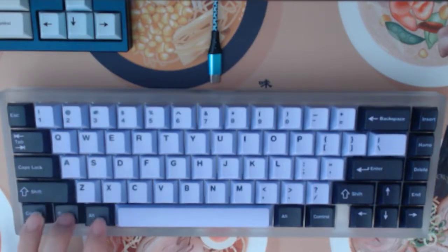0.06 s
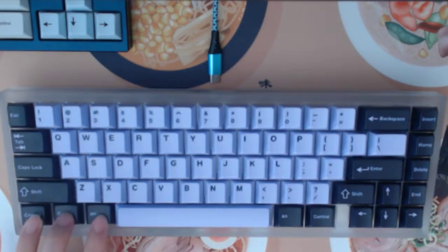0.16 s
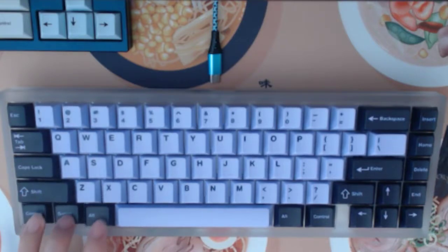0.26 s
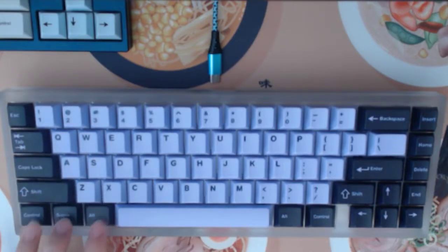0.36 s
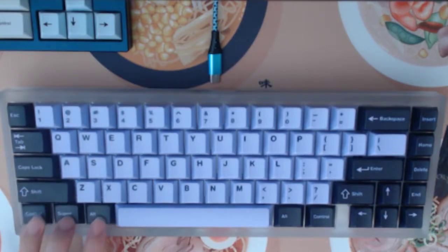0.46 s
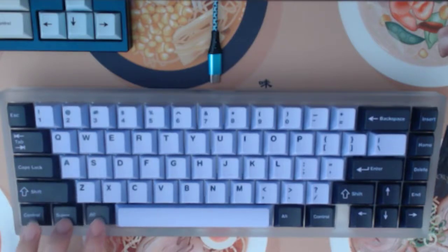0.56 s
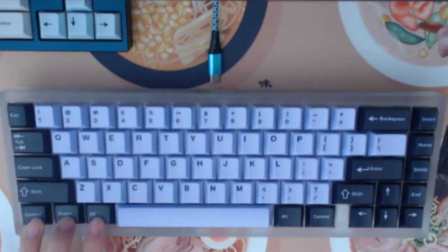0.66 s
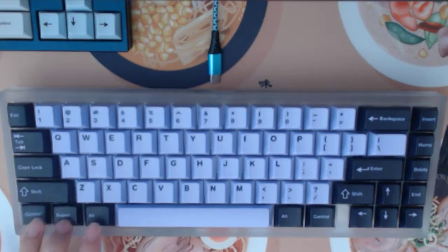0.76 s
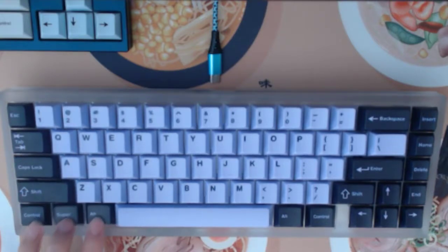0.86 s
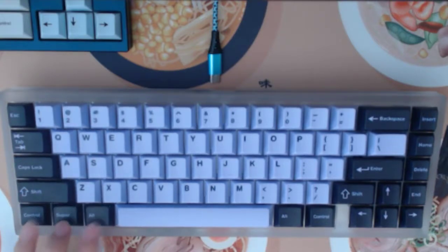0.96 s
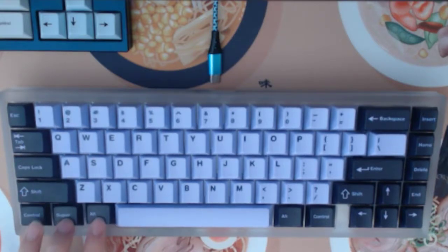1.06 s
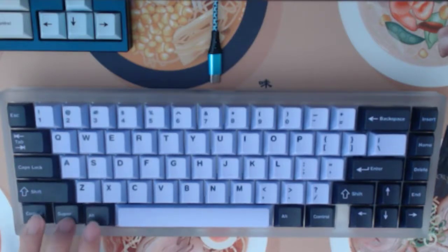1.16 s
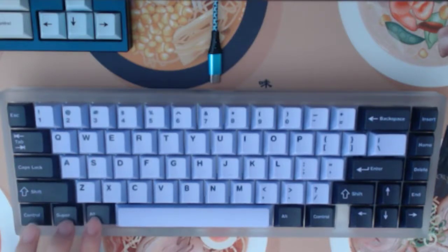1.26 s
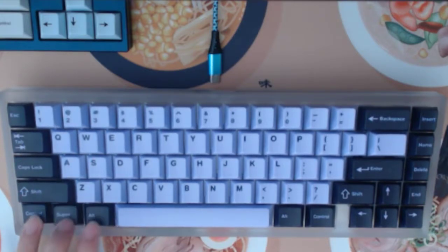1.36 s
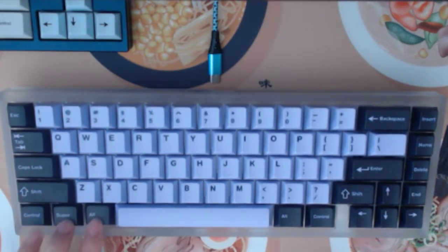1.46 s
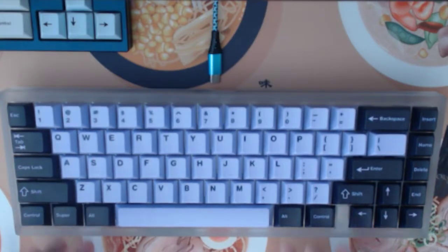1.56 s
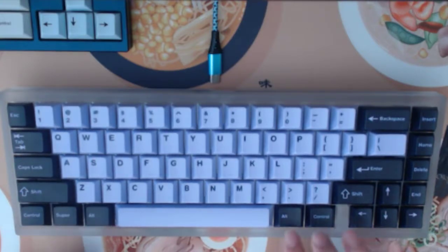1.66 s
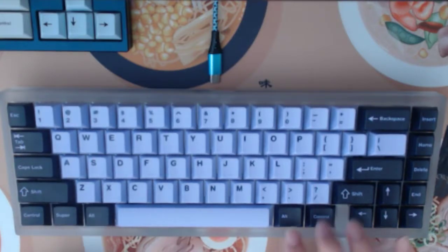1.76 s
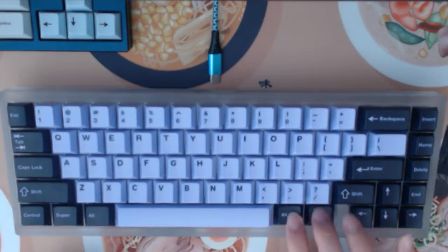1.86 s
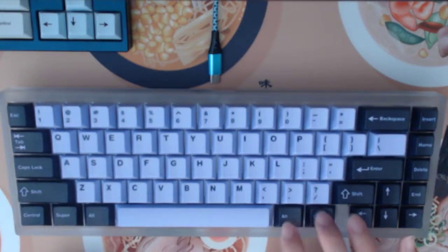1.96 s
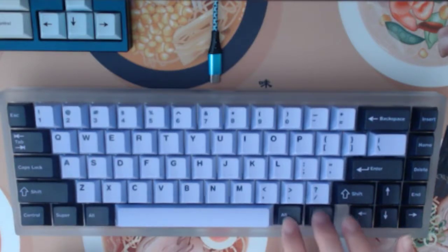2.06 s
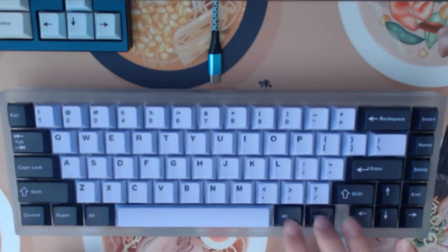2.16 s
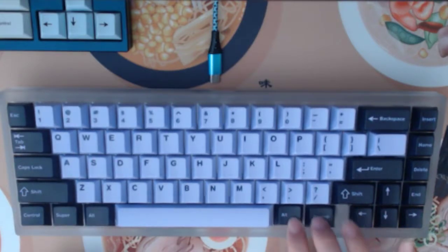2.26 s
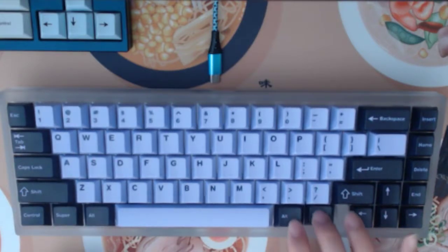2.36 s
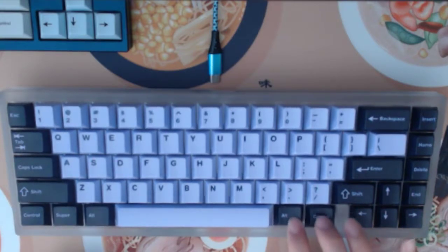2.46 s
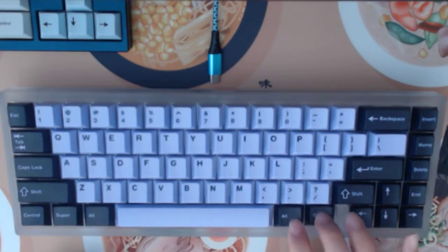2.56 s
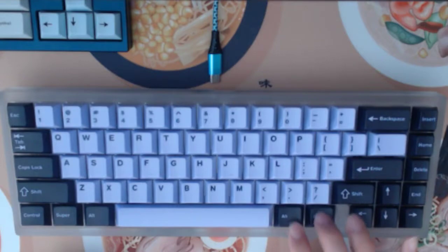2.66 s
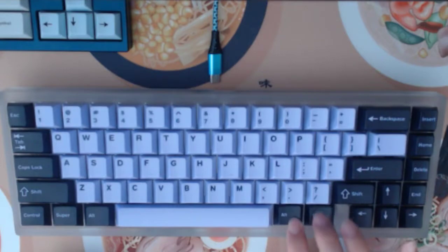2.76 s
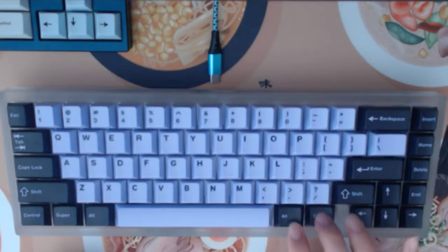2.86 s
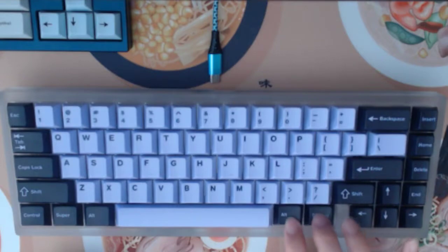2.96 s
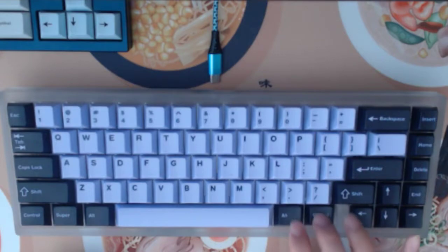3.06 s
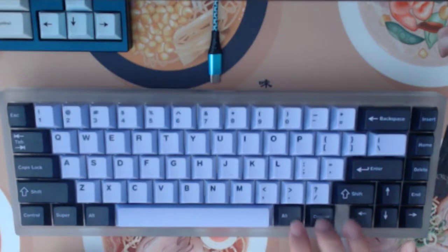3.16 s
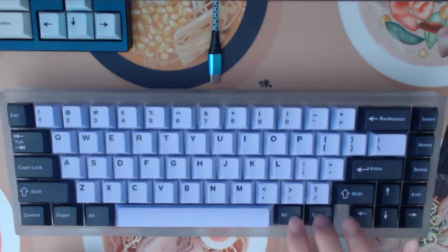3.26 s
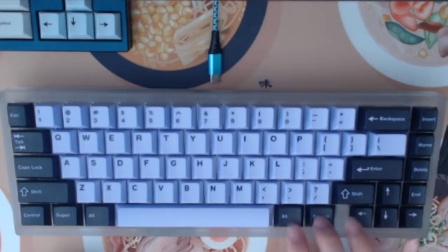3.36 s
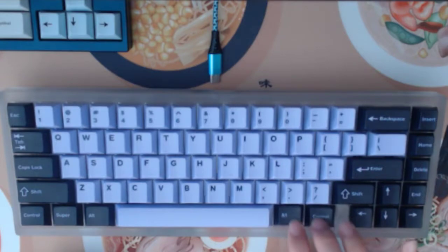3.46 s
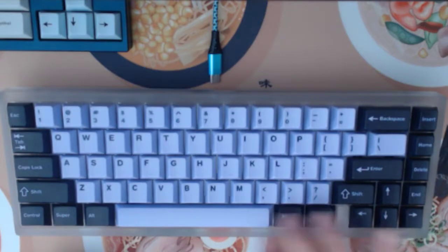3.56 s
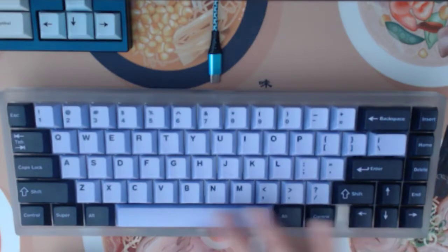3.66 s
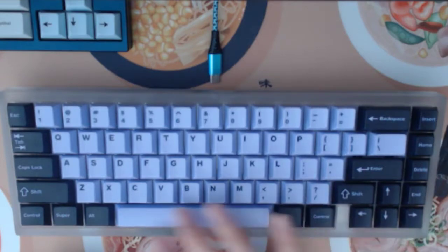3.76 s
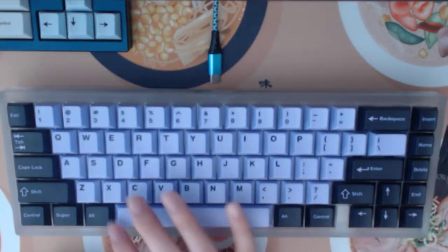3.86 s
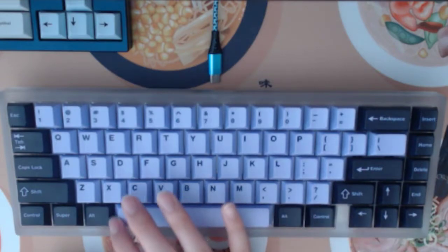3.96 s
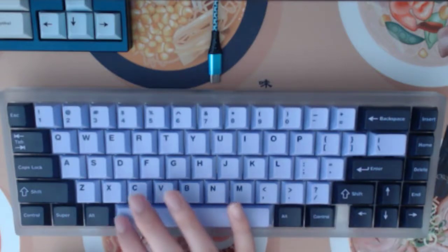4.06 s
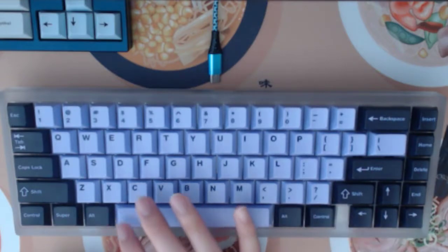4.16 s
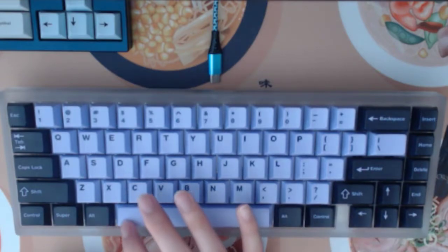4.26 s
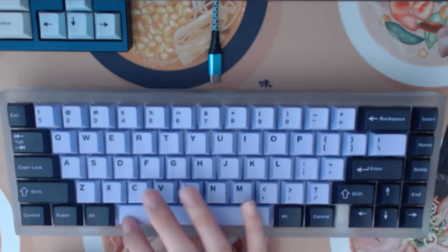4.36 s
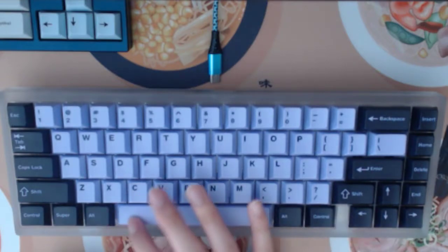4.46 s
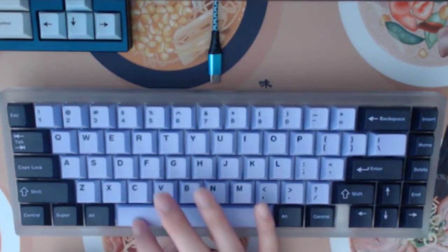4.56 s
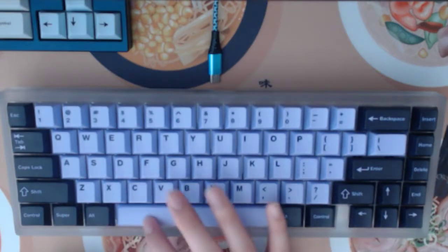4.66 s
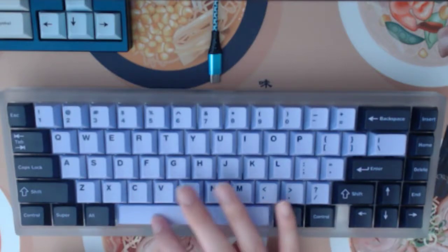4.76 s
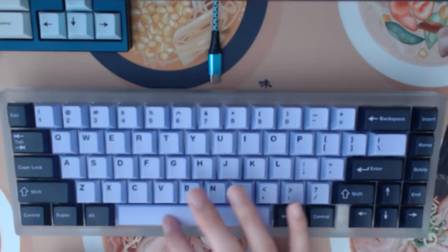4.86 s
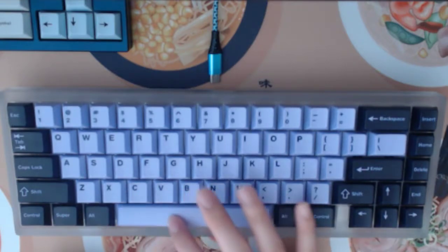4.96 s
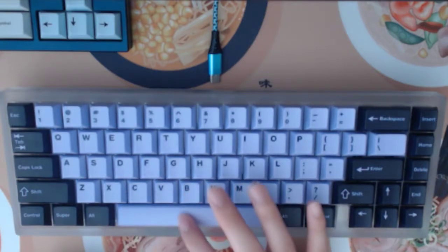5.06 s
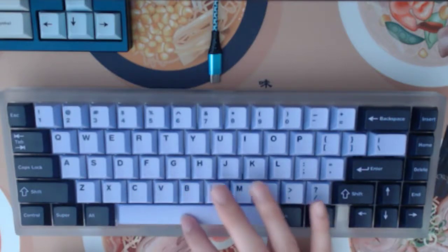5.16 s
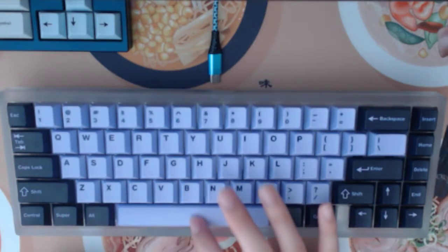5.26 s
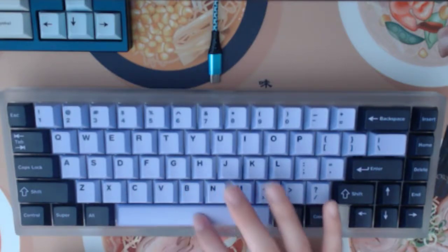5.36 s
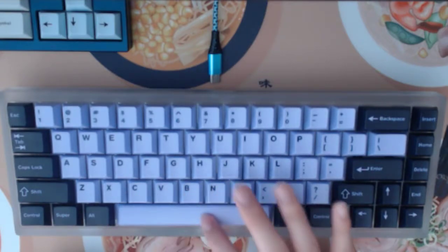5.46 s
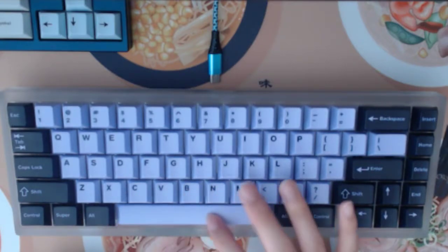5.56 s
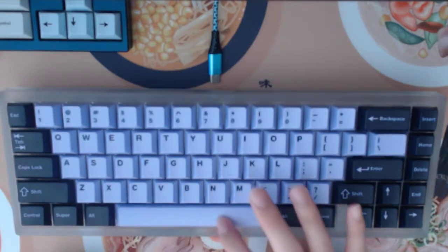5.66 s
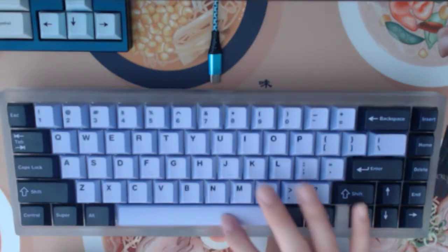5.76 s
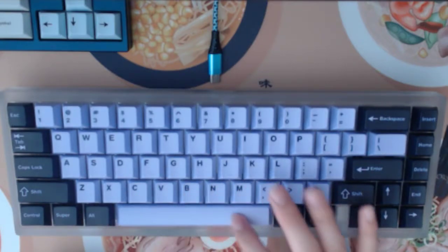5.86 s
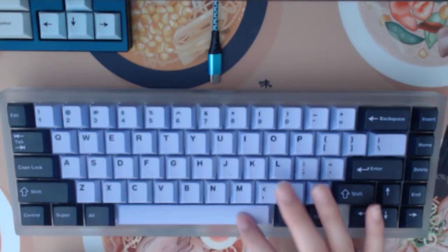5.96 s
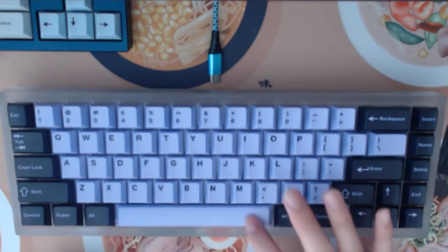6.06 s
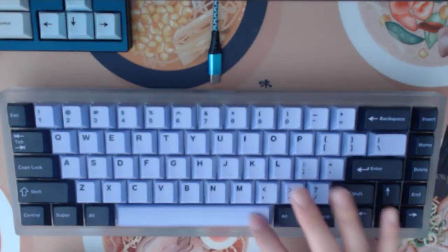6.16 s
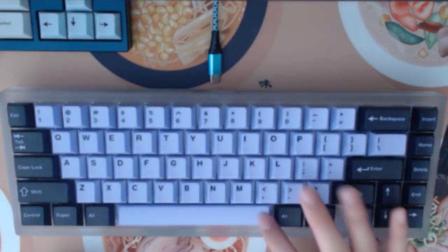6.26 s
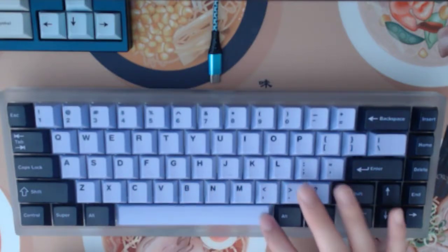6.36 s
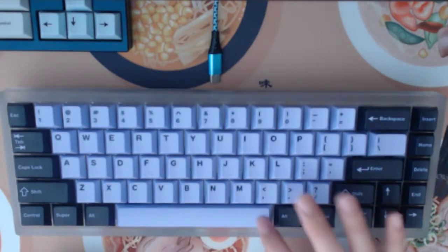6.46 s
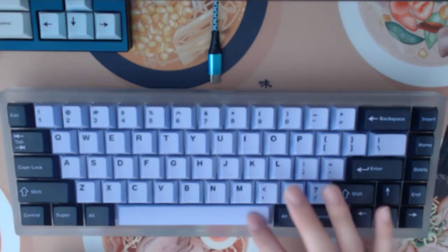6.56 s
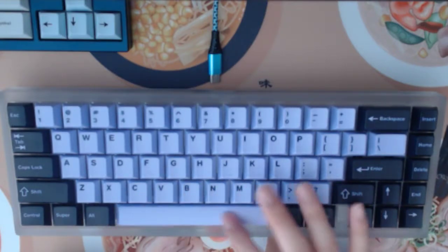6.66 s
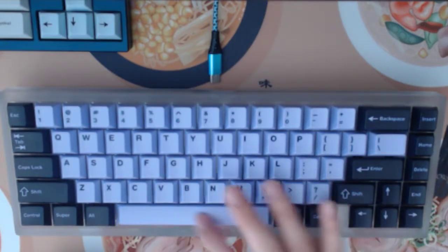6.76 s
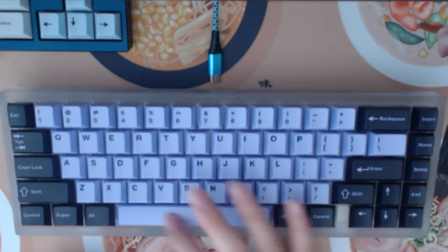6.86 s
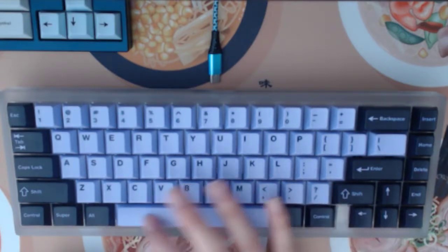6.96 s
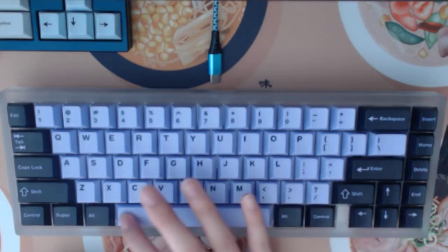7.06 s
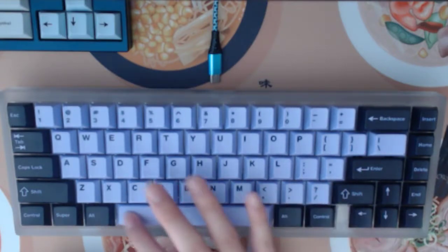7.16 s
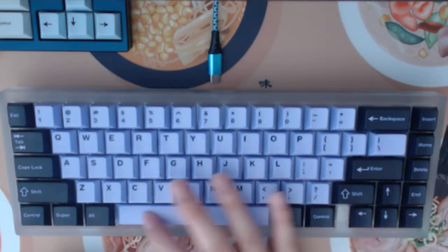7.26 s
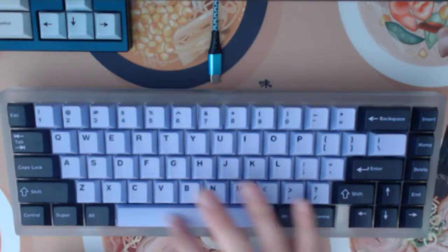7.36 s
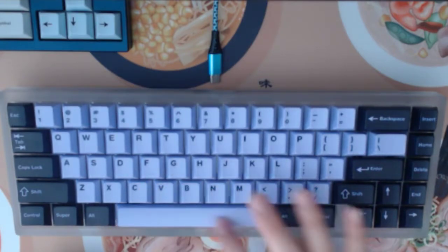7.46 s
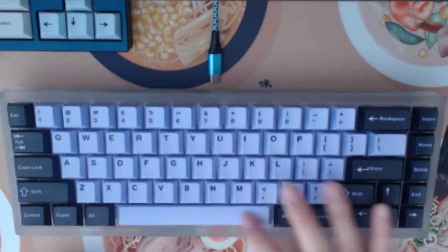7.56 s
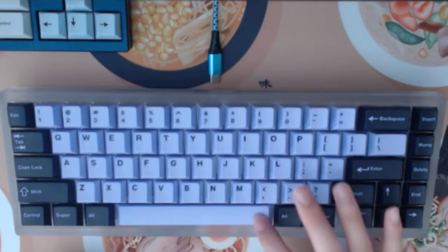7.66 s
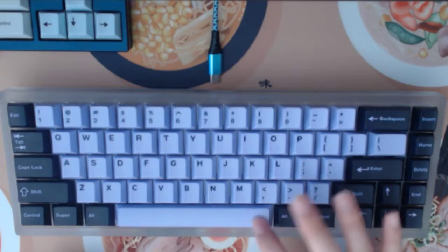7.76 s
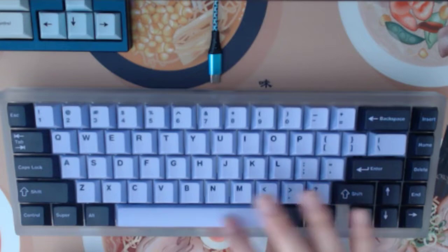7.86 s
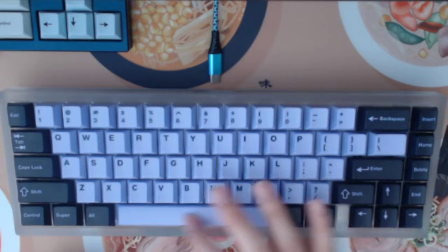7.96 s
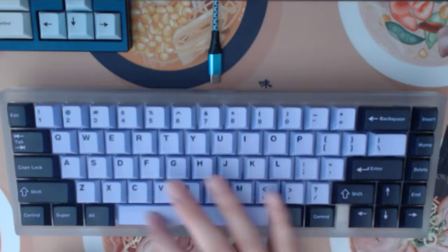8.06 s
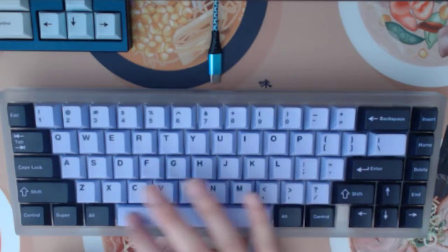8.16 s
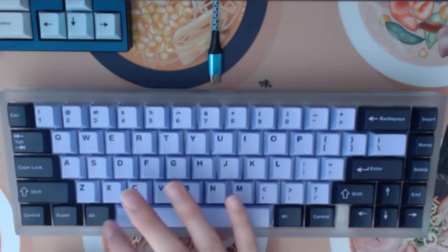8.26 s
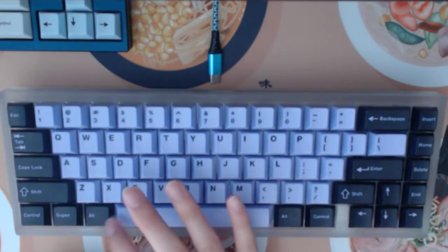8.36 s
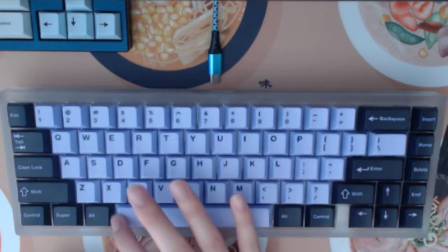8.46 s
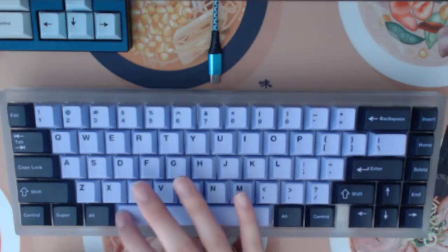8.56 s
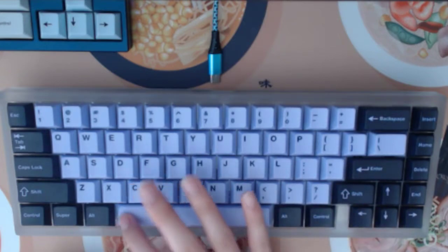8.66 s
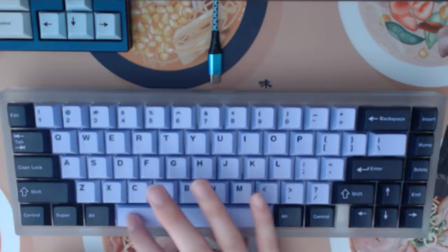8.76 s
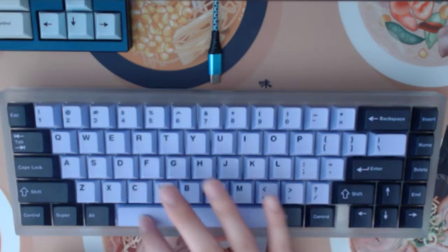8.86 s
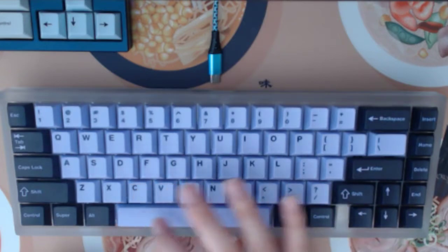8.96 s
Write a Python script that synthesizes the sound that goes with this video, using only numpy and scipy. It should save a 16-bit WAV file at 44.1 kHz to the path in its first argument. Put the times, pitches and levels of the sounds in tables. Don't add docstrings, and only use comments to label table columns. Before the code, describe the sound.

Fingers roll quickly over plastic mechanical keys at both ends, then drum steadily along the hollow, faintly ringing space bar in a small room.

```python
import sys
import numpy as np
from scipy import signal
from scipy.fft import rfft, irfft, next_fast_len
from scipy.io import wavfile
from scipy.ndimage import uniform_filter1d, map_coordinates

SR = 44100
rng = np.random.default_rng(int(sys.argv[2]) if len(sys.argv) > 2 else 0)


def digitize_waveform(pressure):
    field = np.atleast_2d(pressure).T
    bounded = np.clip(field, -1, 1)
    quanta = np.round(bounded * 32767).astype(np.int16)
    wavfile.write(sys.argv[1], SR, quanta)


def rack_gain(trim_db):
    fader = np.asarray(trim_db, float)
    return 10 ** (fader / 20)


N = 397341

# down_s, strength_db, held_s, knock_back_db
BAR_STROKES = [(4.168, -9.5, .0685, -16.5), (4.3156, -13, 0.062, -18.5), (4.4441, -9.5, 0.066, -19),
               (4.5879, -12, 0.062, -18.5), (4.7215, -12, 0.074, -28), (4.8503, -13, 0.064, -19),
               (4.9816, -12.5, 0.067, -18), (5.115, -10.5, 0.069, -16), (5.2576, -10, 0.066, -19.5),
               (5.3921, -10.5, 0.068, -21), (5.5345, -12, 0.062, -18), (5.6618, -14, 0.064, -26.5),
               (5.7976, -13, 0.061, -20), (5.9263, -11.5, .0642, -19.5), (6.058, -11, 0.064, -20.5),
               (6.1967, -9.5, 0.065, -14.5), (6.339, -9, 0.068, -22.5), (6.482, -14.5, 0.059, -27),
               (6.6031, -14.5, 0.063, -17), (6.7371, -15, 0.061, -38),
               (6.8505, -14.5, .0574, -21), (6.98, -14, 0.062, -21.5), (7.0953, -11.5, .0665, -19),
                    (7.2281, -13, 0.068, -14), (7.3653, -8.5, 0.074, -21.5), (7.5124, -14, 0.058, -27),
                    (7.6332, -18, 0.055, -24), (7.75, -9.5, 0.069, -16), (7.8945, -11.5, 0.063, -17.5),
                    (8.0398, -14, 0.059, -28.5), (8.1393, -11, .0565, -15), (8.3823, -13, 0.052, -18),
                    (8.5104, -8, 0.067, -21.5), (8.6517, -8.5, 0.069, -13.5), (8.7747, -8.5, 0.067, -16.5)]
# start_s, place (0 left end - 1 right end)
BAR_PLACE = [
    (4.15, 0.062),
    (4.75, 0.28),
    (5.6, 0.67),
    (6.6, 0.99),
    (6.9, 0.32),
    (7.25, 0.25),
    (7.65, 1),
    (8.0, 0.3),
    (8.4, 0.077),
    (8.8, 0.28),
]
DOWN_BRIGHT = [0.19, 0, -0.8, -0.22, 0.49, 0.18, -0.19, 0, -0.5, 0, 0, 0, 0, -1.3, -0.23, 0.94, 0.3, -0.47,
               -0.18, -1, 0, 0.038, 1, 0, 0, -0.34, 0.4, -0.16, -1.2, 0, 1, -1.1, 1, 0.35, 0.081]
UP_DULLNESS = [-1.5, 1.5, 0, 0, -1, 0, 2, -0.5, -1, -0.5, -1.5, 4.5, -0.5, 0, 1.5, -1.5, 0, 2, -1.5, 11.5,
               1.5, -1, 1, -2, 1, 0.5, 0, -1.5, 0, 0, -2.5, 1, 1, -2.5, 0]
# pitch_hz, level_db, t60_s
DOWN_MODES = [(388, -33, 0.041), (629, -25.5, 0.022), (1026, -29.5, 0.016), (1534, -16.5, 0.021),
              (1707, -7, 0.0098), (1980, -8, 0.011), (2410, -8.5, 0.012), (2790, -6, 0.02),
              (3130, -11.5, 0.023), (4000, -27.5, 0.007), (4720, -15.5, 0.02), (5016, -8, 0.0068),
              (6180, -11, 0.0043), (6600, -16, 0.0066), (7920, -17, 0.0036), (8500, -5, 0.0012),
              (10860, -19, 0.003), (12900, -20.5, 0.0015)]
# pitch_hz, level_db, t60_s
UP_MODES = [(614, -12.5, 0.0042), (1120, -20, 0.014), (1495, -14.5, 0.01), (2040, -13.5, 0.012),
            (2560, -17.5, 0.0065), (2850, -15.5, 0.0077), (3050, -11, 0.012), (3630, -29, 0.0083),
            (3940, -15.5, 0.0057), (4860, -15.5, 0.0022), (6260, -23, 0.003), (7600, -19, 0.002),
            (11200, -31, 0.0021)]
# after_blow_db, after_knock_back_db
WIRE_LEVELS = [(-32, -45), (-39, -45), (-40, -52), (-35, -39), (-39, -62), (-43, -42), (-38, -52),
               (-36, -38), (-29.5, -40), (-42, -41.5), (-35, -39), (-37, -49), (-32, -54), (-37, -49),
               (-32, -55), (-33, -37), (-31.5, -59), (-34, -56), (-33, -42), (-40, -71), (-44, -51),
               (-43, -52), (-41, -47), (-38, -45), (-34, -44), (-34, -46), (-37, -51), (-33.5, -38),
               (-34.5, -44), (-43, -63), (-41, -46), (-41, -45), (-43, -49), (-37, -43), (-42, -46)]

# first_down_s, strength_db, second_after_s, second_strength_db
LEFT_ROLLS = [
    (0.0287, -15.5, 0.063, -17.5),
    (0.2088, -15, 0.062, -18),
    (0.3821, -14, .0589, -16.5),
    (0.562, -16, .0605, -20.5),
    (0.7553, -15, 0.059, -17.5),
    (0.9474, -16.5, .0547, -15.5),
    (1.1248, -13.5, 0.062, -15),
    (1.3008, -13, 0.061, -17.5),
]
# start_s, strength_db
LEFT_RETURNS = [
    (0.1644, -25.5),
    (0.34, -21),
    (0.522, -22.5),
    (0.701, -27),
    (0.895, -19.5),
    (1.078, -22.5),
    (1.2673, -23),
]
# start_s, strength_db
LEFT_LATE_RETURNS = [
    (0.036, -21.5),
    (0.3987, -27),
    (0.5898, -31),
    (0.7731, -22.5),
    (0.972, -31),
    (1.143, -22),
    (1.328, -24.5),
]
# start_s, strength_db
LEFT_BOUNCES = [
    (.245, -34),
    (.2865, -30),
    (.4595, -26),
    (.6858, -31),
    (.8341, -26.5),
    (1.0205, -28),
    (1.0405, -34),
    (1.206, -24.5),
]
# pitch_hz, level_db, t60_s
LEFT_MODES = [(754, -27.5, 0.029), (1130, -10.5, 0.004), (1703, -8.5, 0.012), (2100, -7, 0.0071),
              (2603, -14.5, 0.024), (2920, -12, 0.021), (3140, -6.5, 0.015), (3570, -13, 0.0071),
              (3980, -6, 0.0096), (4900, -4.5, 0.0027), (6280, -9.5, 0.0049), (7330, -23.5, 0.011),
              (8600, -6.5, 0.0035), (10800, -14, 0.0038), (13000, -16.5, 0.0024)]
LEFT_KEY_FIRST = [-6, -3, 3.5, 7, 3, -10, -6, 8.5, 1.5, -5, -7, 4, -2.5, 4, -1]
LEFT_KEY_SECOND = [0, 5, 1, 0.5, 1.5, 6.5, 0.5, 7.5, -2.5, 0, 2.5, 9.5, 3.5, 0.5, 0]
LEFT_KEY_BACK = [2, 8, 5.5, -2, 5.5, -11, 1.5, -5, -1, -1, 4, 7.5, -1, -10, -6]
LEFT_KEY_LATE = [2.5, 5.5, 2, 3, -2, 1, 2.5, 4, 1, 0, 3, 6, 1, -12, -1.5]
LEFT_KEY_BOUNCE = [-2.5, 12.5, 5, -8, -3, -5, -3, -6, -14, -6, -11, -5, -15, -12, -11]

# first_down_s, strength_db, second_after_s, second_strength_db
RIGHT_ROLLS = [
    (1.7556, -11.5, 0.047, -14),
    (1.9739, -9.5, 0.045, -11.5),
    (2.1461, -8.5, .043, -13),
    (2.3261, -10, 0.047, -12.5),
    (2.5079, -13, 0.026, -13.5),
    (2.671, -8.5, 0.034, -11),
    (2.8569, -13, .0235, -10),
    (3.0191, -11.5, 0.035, -12),
    (3.1927, -14.5, 0.024, -13.5),
    (3.343, -17, 0.032, -10.5),
]
# start_s, strength_db
RIGHT_RETURNS = [
    (1.747, -28),
    (1.8662, -24),
    (1.9315, -24),
    (2.054, -20.5),
    (2.1124, -27.5),
    (2.454, -22),
    (2.6183, -23),
    (2.9762, -19.5),
    (3.1485, -27),
]
# start_s, strength_db
RIGHT_SNAPS = [
    (2.2753, -16),
    (2.804, -16.5),
    (3.2949, -16),
    (3.4554, -15.5),
]
# pitch_hz, level_db, t60_s
RIGHT_MODES = [(656, -38, 0.0084), (1290, -11.5, 0.0019), (1863, -12.5, 0.0092), (2566, -5, 0.0065),
               (2795, -11, 0.024), (3214, -5.5, 0.0077), (4300, -15.5, 0.0051), (5020, -11.5, 0.0022),
               (6500, -7, 0.0045), (7350, -18, 0.011), (8500, -11, 0.0059), (9030, -22.5, 0.0035),
               (11030, -25, 0.0022), (13370, -26.5, 0.0023)]
RIGHT_KEY_FIRST = [-12, 1, 3, -1, -2, 2.5, -12.5, 1, -6.5, 4, -4, 14.5, -2.5, 4.5]
RIGHT_KEY_SECOND = [4, -5, -4, 3.5, -1, 1.5, 7, 9.5, 1.5, 3.5, 5, -9.5, 12.5, 5.5]
RIGHT_KEY_BACK = [15.5, 8, 6.5, 1.5, -1, 2, -4.5, -13, -1, -5, -8.5, 0.5, -4.5, -4.5]
RIGHT_KEY_SNAP = [2.5, 3.5, -3.5, 1.5, -1, 4, -3, -21, -1.5, -8.5, -11, -6, -15.5, -15]

# start_s, strength_db, dullness_db
LANDINGS = [(0.904, -34, -8), (1.173, -28, -11.5), (2.796, -35.5, -9), (4.292, -31, 4), (5.5205, -27, 3),
            (5.643, -31, 7), (5.7765, -31, -4), (5.903, -27.5, 1), (6.039, -33, -3), (6.18, -28, 0),
            (6.325, -27, 0), (7.491, -30, 5)]
BRUSH_TIMES = [.001, .117, .1432, .1755, .8548, 1.234, 1.400, 1.792, 2.2384, 2.312, 2.408, 2.580, 2.6066,
               2.7714, 2.9435, 3.106, 3.139, 3.24, 3.447, 3.861, 4.5645, 4.701, 4.967, 6.17, 6.657, 6.71,
               6.955, 7.032, 7.207, 7.275, 7.345, 7.865, 8.01, 8.21, 8.36]
# strength_db, dullness_db
BRUSHES = [(-41, 2), (-38, 5.5), (-28, 0), (-35, -7.5), (-27, -2), (-31, 8), (-32, 9), (-34.5, 0.5),
           (-23, 1.5), (-38, -0.5), (-25.5, 5.5), (-32, 3.5), (-45.5, 2), (-30.5, 4.5), (-30.5, 2.5),
           (-33, 4), (-35, 3.5), (-37, 5.5), (-35.5, 9), (-46, -4), (-50, -12), (-31, 2), (-37, 0),
           (-40, 6), (-41, -5.5), (-48, -8), (-32, 3), (-44, -9), (-37, 8), (-36, 0), (-40, 3), (-45, -5),
           (-44, -10), (-37, 2), (-42, -6)]
# pitch_hz, level_db, t60_s
TOUCH_MODES = [(880, -6, 0.0067), (1445, -2, 0.0042), (2575, 2, 0.0031), (3400, -6, .003),
               (4800, -16.5, 0.0035), (6700, -7, 0.0015), (8500, -14.5, .002), (10750, -20.5, 0.0015)]
# contacts (start_s, strength_db), level_db of each lone mode
LONE_TAPS = [
    ([(1.439, -34.5)], [2, 10, 0, 0, -3, -3, -3, -5, -3, -6, -3]),
    ([(1.4663, -32)], [-7, -6, 6, -10, 7.5, -6, -8, -2, -5, -2, -6]),
    ([(3.8652, -28), (3.8678, -23.5)], [-2, -5, -9, 1, 0.5, -1, 0, 2.5, 2, 3, 0]),
    ([(3.9353, -26.5)], [-1, 3, 4, -2, 1, -4, 0.5, -5, 3, 5, 0]),
    ([(8.3655, -35), (8.366, -25)], [8, -8, -8, 2, -8, -12, -1, -4, 2, -3, -6]),
    ([(4.1547, -27.5), (4.4268, -28), (4.5696, -30.5), (8.4945, -30), (8.6352, -29.5)], [2.5, -7, -4, 3.5, -6, -6, 1, -2, 2, -2, -2]),
]
# pitch_hz, level_db, t60_s
LONE_MODES = [(935, -9, 0.0093), (1340, -10, .008), (1800, -9, 0.0072), (2530, -4, 0.0058),
              (3120, -9, .008), (4000, -13, .006), (4450, -14, .006), (6050, -12.5, 0.0043),
              (7100, -17, 0.003), (8260, -21, 0.0033), (10800, -24, 0.0023)]
# middle_s, half_length_s, level_db
SLIDES = [
    (.008, 0.045, -59.5),
    (1.566, 0.039, -61),
    (1.707, 0.086, -71),
    (4.078, 0.03, -74),
]
# pitch_hz, level_db
SKIN_COLOUR = [(800, -4), (3000, -5.5), (7000, -10.5), (11000, -9.5), (16000, -21)]
# start_s, strength_db
THUDS = [
    (1.669, -37),
    (1.684, -39.5),
]
# pitch_hz, level_db, t60_s
PAD_MODES = [(131.4, 0.5, 0.035), (650, 3, 0.0053), (1240, -6.5, 0.0072), (1810, -12, 0.007)]

# centre_hz, half_width_hz, level_db
HOLLOWS = [(495, 12, -12), (849, 15, -16.5)]
# pitch_hz, level_db, t60_s
DESK_LEFT = [(66.7, -18, 0.2), (102, -33, 0.47), (203, -17, 0.068)]
DESK_RIGHT = [(62, -35.5, 0.11), (98.5, -31.5, 0.071), (169, -22, 0.052), (213.6, -30.5, 0.033)]
DESK_MIDDLE = [(69, -19, 0.041), (98, -19, 0.063), (173, -33.5, 0.33), (211, -64, 0.068),
               (263.3, -31, 0.32), (378, -48, 0.053)]
# pitch_hz, level_db
RUMBLE_COLOUR = [(25, -23), (50, 6), (120, 0.5), (250, -3.5), (400, -8), (700, -44)]
# delay_s, level_db, blur_s
ECHOES = [(0.01, -21, 0.0038), (0.02, -32, 0.0018), (0.024, -26, 0.002), (0.046, -35, 0.0013)]
# pitch_hz, t60_s
ROOM_DECAY = [(300, 0.24), (1800, 0.39), (5000, 0.38), (13000, 0.49)]
# pitch_hz, level_db
ROOM_COLOUR = [(200, -20.5), (800, -0.5), (1500, -0.5), (2200, -1), (3200, -5.5), (4000, -4.5), (6000, -6),
               (8500, -8), (11000, -6.5), (16000, -6)]
# pitch_hz, level_db
WALL_COLOUR = [(3500, 2.5), (6000, 4), (12000, 2.5)]
# pitch_hz, level_db
SIDEWAYS_LEFT = [(1300, -4), (1900, -5.5), (2700, 0), (4200, -4.5), (6500, -1.5), (8500, 1), (11000, -3)]
SIDEWAYS_RIGHT = [(1200, -0.5), (1800, 2.5), (2200, -3), (2900, -4), (3800, 0.5), (5000, -1.2), (6500, -4),
                  (8500, 0)]
SIDEWAYS_BAR = [(1400, 1.2), (1900, 1.6), (2800, -1), (3900, 6), (4500, -1.5), (5100, 0), (6500, -3),
                (10000, 1)]
SIDEWAYS_LIGHT = [(1900, -2.2), (2700, -2.6), (6000, -1.8), (9000, 0)]
# pitch_hz, level_db (per Hz)
AIR_COLOUR = [(15, -37.5), (22, 1.5), (45, -10), (80, 0), (120, 0), (190, -4), (270, -3.5), (350, -7),
              (420, -13.5), (600, -17.5), (1100, -25.5), (1700, -30), (7300, -45.5), (15000, -50)]
# pitch_hz, level_db
MICROPHONE = [(12000, -1), (14500, -0.5), (15700, -4.5), (16300, -23.5), (18000, -74)]

FIRM = dict(scatter_db=-0.9, detune=0.0039, rattle_db=-31, rattle_t60=0.014, travel=0.00045)
LOOSE = dict(scatter_db=2.5, detune=0.0082, rattle_db=-26, rattle_t60=0.019, travel=0.00027)
GRAZING = dict(scatter_db=1.5, detune=0.006, rattle_db=-20, rattle_t60=0.021, travel=0.00024)


def bar_strokes():
    s, down_db, held, up_db = np.transpose(BAR_STROKES)
    return s, down_db, held, up_db, np.interp(s, *np.transpose(BAR_PLACE))


def bar_down():
    s, down_db, _, _, where = bar_strokes()
    case_db = -0.26 * (down_db + 12) + 4 * where
    cap_db = -0.5 * where + DOWN_BRIGHT
    wire_hollow = (3036, 45, -9.5)
    blows = rack_gain(0.5) * clack(np.transpose([s, down_db, case_db, cap_db]), DOWN_MODES, scatter_db=1.12,
                             detune=0.0077, rattle_db=-26.5, rattle_t60=0.012, travel=0.0004,
                             hollows=HOLLOWS + [wire_hollow])
    far_end = np.roll(blows[0], round(0.0012 * SR))
    blows[0] += coloured(far_end, [(3000, -40), (6500, -25), (12000, -11)])
    return blows


def bar_up():
    s, _, held, up_db, where = bar_strokes()
    case_db = -2.5 * where + UP_DULLNESS
    cap_db = -7 * where - UP_DULLNESS
    return -rack_gain(0.5) * clack(np.transpose([s + held, up_db, case_db, cap_db]), UP_MODES, scatter_db=0.5,
                             detune=0.012, rattle_db=-17, rattle_t60=0.017, travel=0.000335)


def bar_wire():
    s, _, held, _, _ = bar_strokes()
    t = np.arange(SR // 16) / SR
    hz = 2848 * (1 + 0.0027 * rng.standard_normal((2 * len(s), 1)))
    swell = 1 - np.exp(-(t / 0.0023) ** 2)
    ring = rack_gain(15.5 - 60 * t / 0.03) * swell * np.sin(2 * np.pi * hz * t)
    return place(np.r_[s, s + held], rack_gain(np.transpose(WIRE_LEVELS).reshape(-1, 1)) * ring)


def bar_desk():
    s, down_db, held, up_db, _ = bar_strokes()
    times = np.r_[s, s + held]
    strength_db = np.r_[down_db, up_db - 4]
    along_db = -2 * np.interp(times, *np.transpose(BAR_PLACE))
    jolts = np.transpose([times, strength_db + 2 + along_db])
    return desk(jolts, DESK_MIDDLE, swell=0.04, rumble_db=-35.5)


def left_end():
    first, second = split(LEFT_ROLLS)
    down = key(first, LEFT_MODES, LEFT_KEY_FIRST, FIRM) + key(second, LEFT_MODES, LEFT_KEY_SECOND, FIRM)
    back = key(LEFT_RETURNS, LEFT_MODES, LEFT_KEY_BACK, LOOSE)
    back = back + key(LEFT_LATE_RETURNS, LEFT_MODES, LEFT_KEY_LATE, LOOSE)
    bounce = key(LEFT_BOUNCES, LEFT_MODES, LEFT_KEY_BOUNCE, LOOSE)
    keys = room(rack_gain(-2) * (down + back + bounce), wet_db=-4.5, walls_db=[-16.5, -13, -11, -21],
                sideways=SIDEWAYS_LEFT)
    blows = first + second + LEFT_RETURNS + LEFT_LATE_RETURNS
    return keys + desk(blows, DESK_LEFT, swell=0.042, rumble_db=-34)


def right_end():
    first, second = split(RIGHT_ROLLS)
    down = key(first, RIGHT_MODES, RIGHT_KEY_FIRST, FIRM) + key(second, RIGHT_MODES, RIGHT_KEY_SECOND, FIRM)
    back = key(RIGHT_RETURNS, RIGHT_MODES, RIGHT_KEY_BACK, LOOSE)
    back = back + key(RIGHT_SNAPS, RIGHT_MODES, RIGHT_KEY_SNAP, FIRM)
    keys = room(rack_gain(0.5) * (down + back), wet_db=-10, walls_db=[-20, -14, -16, -15], sideways=SIDEWAYS_RIGHT)
    blows = first + second + RIGHT_RETURNS + RIGHT_SNAPS
    return keys + desk(blows, DESK_RIGHT, swell=0.0066, rumble_db=-54)


def light_touches():
    brushes = [(s, db, dull_db) for s, (db, dull_db) in zip(BRUSH_TIMES, BRUSHES)]
    contacts = [(s, db, dull_db, -dull_db) for s, db, dull_db in LANDINGS + brushes]
    touches = rack_gain(-5) * clack(contacts, TOUCH_MODES, scatter_db=-1, detune=0.03, rattle_db=-25,
                              rattle_t60=0.03, travel=0.00031)
    return touches + sum(key(blows, LONE_MODES, share_db, GRAZING) for blows, share_db in LONE_TAPS)


def skin():
    t = np.arange(N) / SR
    stroke = sum(rack_gain(db) * np.exp(-((t - s) / half) ** 2) for s, half, db in SLIDES)
    hiss = coloured(rng.standard_normal(N), SKIN_COLOUR)
    pats = clack([(s, db, 0, 0) for s, db in THUDS], PAD_MODES, scatter_db=3, detune=0.051,
                 rattle_db=-37, rattle_t60=0.018, travel=0.0011)
    return stroke * hiss / np.std(hiss) + pats


def split(rolls):
    first = [(s, db) for s, db, _, _ in rolls]
    second = [(s + after, db) for s, _, after, db in rolls]
    return first, second


def key(blows, modes, share_db, manner):
    own = [(hz, db + more_db, t60) for (hz, db, t60), more_db in zip(modes, share_db)]
    return clack([(s, db, 0, 0) for s, db in blows], own, **manner)


def clack(contacts, modes, scatter_db, detune, rattle_db, rattle_t60, travel, hollows=HOLLOWS):
    s, strength_db, case_db, cap_db = np.transpose(contacts)
    hz, level_db, t60 = np.transpose(modes)
    f, t = np.fft.rfftfreq(4096, 1 / SR), np.arange(1024) / SR
    level_chance, pitch_chance, noise = np.split(
        rng.standard_normal((len(s), 2 * len(hz) + len(t))), [len(hz), 2 * len(hz)], axis=1)

    share_db = np.outer(case_db - np.median(case_db), hz < 2300)
    share_db = share_db + np.outer(cap_db - np.median(cap_db), hz > 4500)
    gain = rack_gain(level_db + share_db + scatter_db * level_chance)[..., None]
    pitch = (hz * (1 + detune * pitch_chance))[..., None]
    half_width = np.log(1000) / (2 * np.pi * t60[:, None])
    radiated = np.minimum(f / pitch, pitch / (f + 1)) ** 2
    power = np.sum(gain ** 2 * radiated / ((f - pitch) ** 2 + half_width ** 2), axis=1)
    power = power * rack_gain(2 * sum(db / (1 + ((f - c) / w) ** 2) for c, w, db in hollows))

    rattle = rfft(rack_gain(rattle_db - 60 * t / rattle_t60) * noise, 4096)
    rattle = rattle * np.sqrt(1 + (f / 3400) ** 2)
    bending = np.exp(-4j * np.pi * travel * np.sqrt(1000 * f))
    late = 0.00035 * np.abs(map_coordinates(rng.standard_normal(40), [f / 600]))
    late = late / (1 + (5000 / (f + 1)) ** 4)
    spread = np.exp(-2j * np.pi * np.cumsum(late) * f[1])
    near = irfft(causal(power) * (1 + rattle) * bending * spread)[:, :3072]

    blurred = uniform_filter1d(power, size=70, axis=1)
    far = irfft(causal(np.where(f < 1200, power, blurred)))
    strength = rack_gain(strength_db)[:, None] * SR / (4 * np.pi)
    return np.array([place(s, strength * row) for row in (near, far)])


def causal(power):
    cepstrum = irfft(np.log(power + 1e-14) / 2)
    return np.exp(rfft(cepstrum * np.r_[1, np.full(2047, 2), 1, np.zeros(2047)]))


def desk(contacts, modes, swell, rumble_db):
    s, strength_db = np.transpose(contacts)
    t = np.arange(SR // 4) / SR
    boom = sum(rack_gain(db - 60 * t / t60) * np.sin(2 * np.pi * hz * t) for hz, db, t60 in modes)
    shake = coloured(rng.standard_normal(len(s) * len(t)), RUMBLE_COLOUR).reshape(len(s), -1)
    shake = rack_gain(rumble_db - 60 * t / 0.43) * shake / np.std(shake)
    return place(s, rack_gain(strength_db)[:, None] * (boom + shake) * (1 - np.exp(-t / swell)))


def room(x, wet_db, walls_db, sideways):
    hz, t, z = signal.stft(rng.standard_normal((4, SR // 2)), SR, nperseg=256)
    decay = rack_gain(-60 * t / along(ROOM_DECAY, hz)[:, None])
    tail = signal.istft(z * decay, SR, nperseg=256)[1]
    t = np.arange(tail.shape[1]) / SR
    tail = tail * (1 - np.exp(-(t / 0.012) ** 2))
    tail = rack_gain(wet_db) * tail / np.linalg.norm(tail[0])
    blur = rng.standard_normal(tail.shape)
    walls = sum(rack_gain(db + more_db) * blur * np.exp(-((t - s) / spread) ** 2)
                for (s, db, spread), more_db in zip(ECHOES, walls_db))
    paths = [coloured(coloured(a + coloured(b, WALL_COLOUR), ROOM_COLOUR), sideways) for a, b in zip(tail, walls)]

    near, far = x
    share = 0.54
    pose = (np.arange(N) / SR / 0.14).astype(int) % (len(paths) - 1)
    wet = np.zeros(N)
    for k, path in enumerate(paths[1:]):
        answer = np.sqrt(1 - share ** 2) * paths[0] + share * path
        wet += signal.oaconvolve(far * (pose == k), answer)[:N]
    return near + wet


def air():
    rush = coloured(rng.standard_normal(N), AIR_COLOUR)
    return rack_gain(-55) * rush / np.std(rush)


def place(times, sounds):
    at = np.round(times * SR).astype(int)[:, None] + np.arange(sounds.shape[1])
    return np.bincount(at.ravel(), sounds.ravel(), N + sounds.shape[1])[:N]


def coloured(x, points):
    m = next_fast_len(len(x) + 8192)
    gain = rack_gain(along(points, np.fft.rfftfreq(m, 1 / SR)))
    return irfft(rfft(x, m) * gain, m)[:len(x)]


def along(points, hz):
    f, v = np.transpose(points)
    return np.interp(np.log(hz + 1), np.log(f + 1), v)


def scene():
    blows = room(bar_down(), wet_db=-10, walls_db=[-19, -15, -16.5, -15], sideways=SIDEWAYS_BAR)
    light = room(bar_up() + light_touches() + skin(), wet_db=-3, walls_db=[-12, -15.5, -11.5, -15.5],
                 sideways=SIDEWAYS_LIGHT)
    space_bar = blows + bar_wire() + bar_desk()
    return (space_bar + left_end() + right_end() + light + air())[None]


def top_cut(x):
    return signal.sosfilt(signal.butter(12, 16780, fs=SR, output="sos"), x)


def record(dry):
    mix = coloured(dry[0], MICROPHONE)[None]
    return top_cut(mix)


dry = scene()
out = record(dry)
digitize_waveform(out)
```